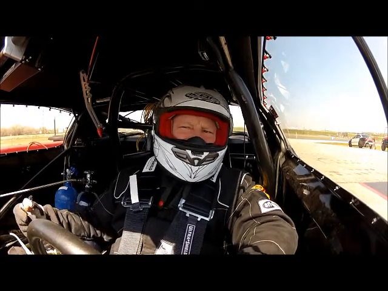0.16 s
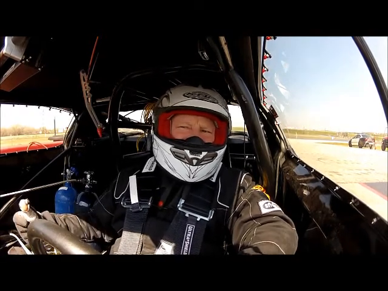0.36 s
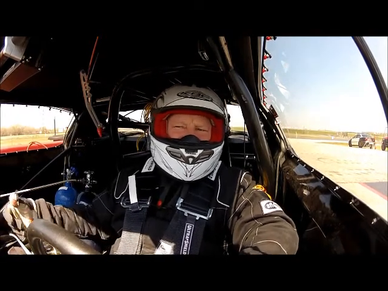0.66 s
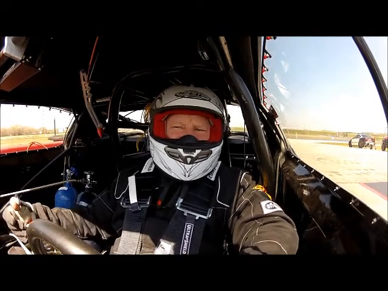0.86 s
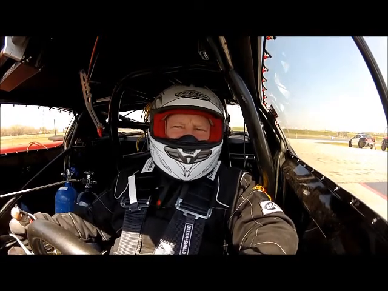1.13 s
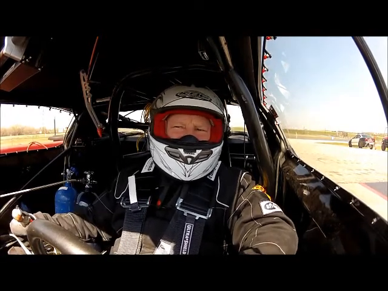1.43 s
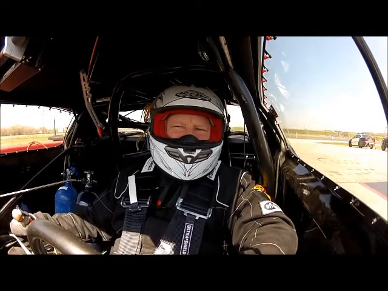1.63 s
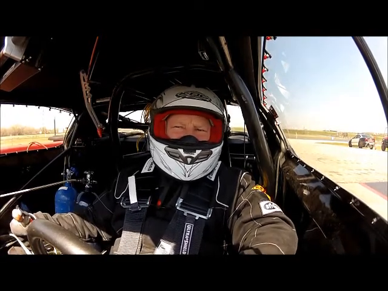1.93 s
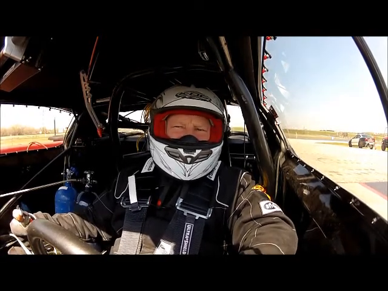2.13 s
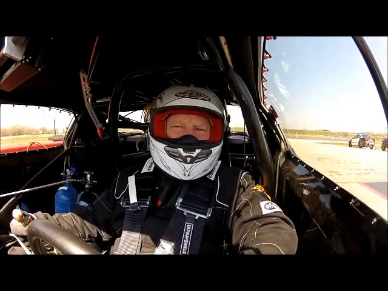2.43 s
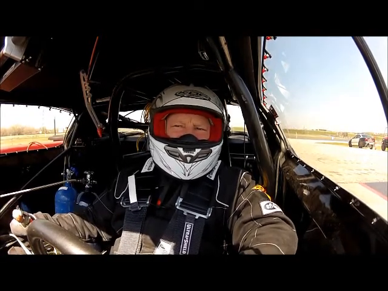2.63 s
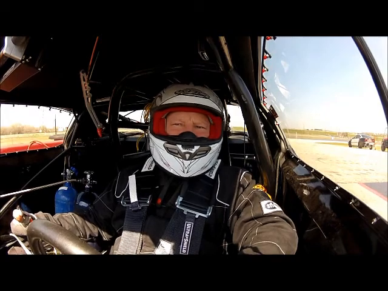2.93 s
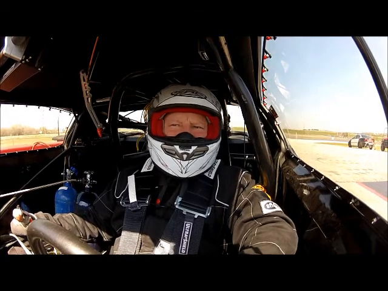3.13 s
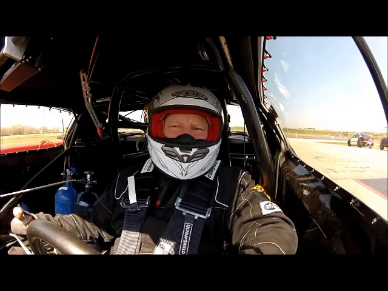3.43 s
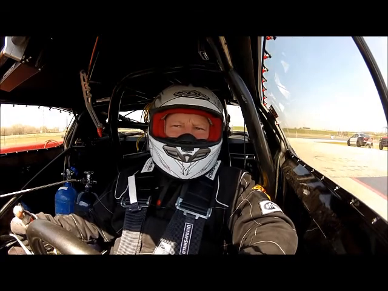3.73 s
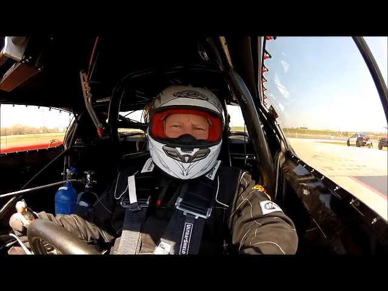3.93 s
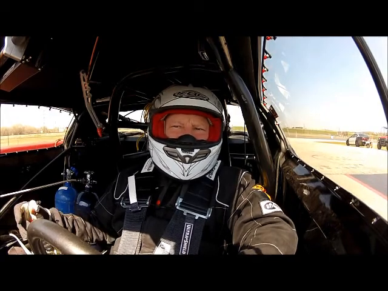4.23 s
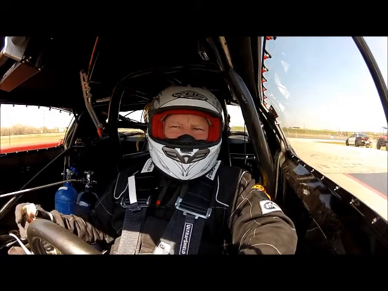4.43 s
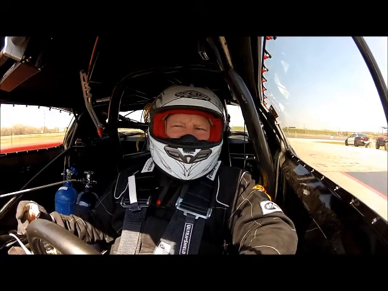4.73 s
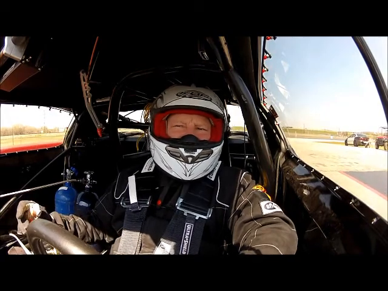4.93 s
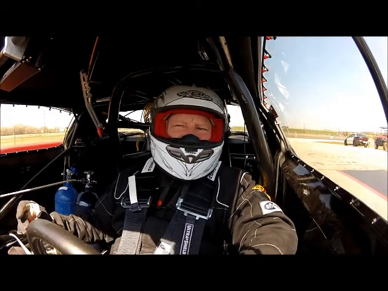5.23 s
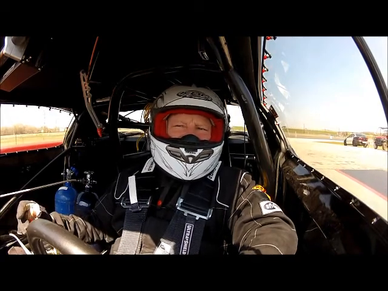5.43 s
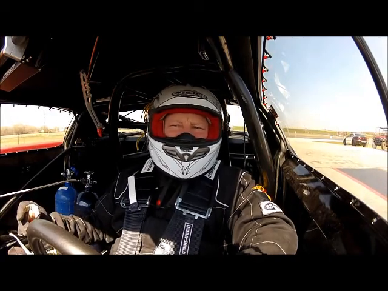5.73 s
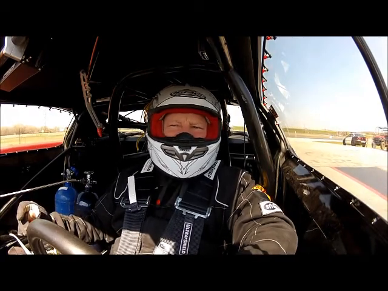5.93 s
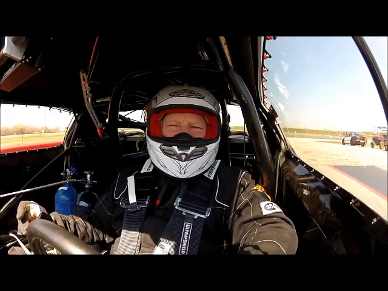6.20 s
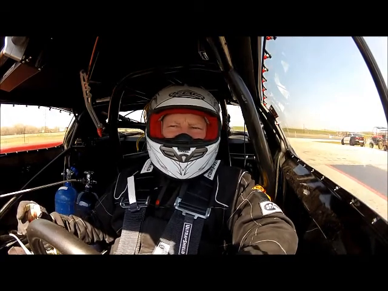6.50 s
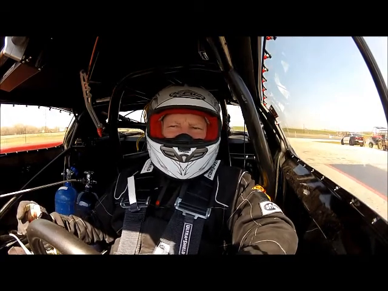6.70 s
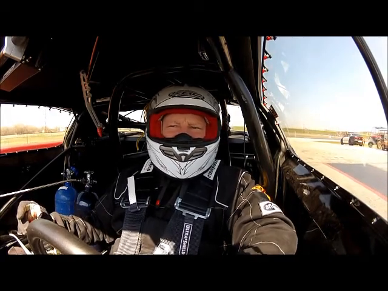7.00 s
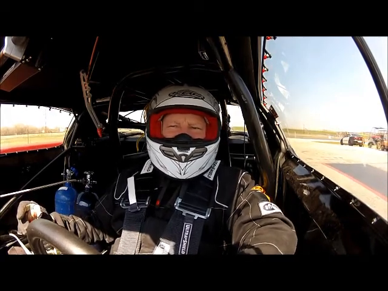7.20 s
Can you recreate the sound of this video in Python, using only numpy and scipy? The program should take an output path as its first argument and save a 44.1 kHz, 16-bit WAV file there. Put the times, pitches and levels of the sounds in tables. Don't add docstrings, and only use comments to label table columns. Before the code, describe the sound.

Inside a stripped race car, deep uneven idle rumble and hard metallic clatter pulse steadily, rev sharply midway, waver, then settle back to idle.

```python
import sys
import numpy as np
from scipy import signal
from scipy.io import wavfile
from scipy.ndimage import uniform_filter1d

SR = 44100
rng = np.random.default_rng(int(sys.argv[2]) if len(sys.argv) > 2 else 0)


def wav_record(signal):
    frames = np.transpose(np.atleast_2d(signal))
    bounded = np.clip(frames, -1, 1)
    quanta = np.round(bounded * 32767).astype(np.int16)
    wavfile.write(sys.argv[1], SR, quanta)


def gain_from_decibels(decibels):
    exponent = np.asarray(decibels, float) / 20
    return 10 ** exponent


N = 324576
TIME = np.arange(N) / SR

# time_s, firings_per_s
ENGINE_SPEED = [(2.7, 67.6), (2.81, 88), (2.95, 112), (3.09, 108), (3.22, 87), (3.4, 77), (3.6, 70),
                (3.81, 93), (4.0, 96), (4.2, 86), (5.14, 79), (5.5, 77), (6.11, 87), (6.3, 72), (6.45, 55),
                (6.74, 55), (6.9, 68), (7.36, 67.8)]
# start_s, peak_db, low_panels_db, gain_drop_db
HARD_CLACKS = [(0.167, -7.5, -12, 9), (0.402, -9.5, -21, 3.5), (0.528, -3.5, -14, 4), (0.762, -8.5, -13, 9),
               (0.997, -9.5, -1, 5), (1.12, -11, -6, 4), (1.354, -9, -9, 7.5), (1.594, -9, -6, 3),
               (1.712, -6, -3, 9.5), (2.068, -7.5, 0, 7.5), (2.304, -8.5, -1, 6.5), (2.423, -10, 12, 7.5),
               (2.779, -7, 4.5, 8.5), (3.076, -22, -2, 5.5), (3.552, -10.5, -11, -1), (3.655, -7.5, -10, 4),
               (3.835, -14.5, 5, 5), (3.997, -9.5, 0, 5), (4.356, -9, -14, 7.5), (4.736, -7, -11, 3),
               (5.141, -8, 6.5, 9.5), (5.341, -11, 16.5, 9.5), (5.544, -8.5, 7, 5.5), (5.737, -11, 9, 6.5),
               (5.926, -7, 6, 5.5), (6.456, -4, -2, 15), (6.605, -8, -15, 6.5), (6.751, -6.5, -9, 7),
               (7.0, -7.5, -13, 10), (7.236, -7, -10, 5.5)]
# pitch_hz, width_hz, level_db
LOW_SHEETS = [(1049, 107, -13.5), (1204, 40.7, -5.5), (1302, 53, -10), (1464, 36.6, -4), (1488, 56, -6),
              (1548.6, 42.5, -3), (1721, 13, -13.5), (1784, 47, -12.5)]
MID_SHEETS = [(1993, 76, -11), (2135, 53, -2), (2248, 66, -10), (2340.4, 39, -2)]
HIGH_SHEETS = [(2590, 48, -16.5), (2840, 138, -19), (3230, 90, -18.5), (3520, 105, -21), (3857, 86, -16.5),
               (4265, 162, -24.5), (4734, 150, -31.5), (5520, 210, -30)]

IDLE_PER_S = 67.6
USUAL_DB, USUAL_LOW_DB, USUAL_DROP_DB = -15, -24, 3
CREST_S = 0.003


def boom(count):
    # time_s, level_db
    drive = [(0, -8.5), (0.38, -4.5), (0.52, -8), (0.7, -3), (1.4, -6.5), (1.54, -8), (1.68, -5.5),
             (2.66, -4.5), (2.74, -14), (3.2, -21), (3.62, -6.5), (3.72, -16.5), (4.92, -12), (6.15, -15),
             (6.35, -9), (6.8, -15.5), (6.95, -3.5), (7.3, -6)]
    cabin_hz, cabin_width_hz = 70.2, 4.8
    clicks = firings(count, spread_db=3.0, pattern=0.6, jitter_s=0.0002)
    lead = SR // 4
    led_in = np.concatenate([clicks[lead * 2:lead * 3], clicks])
    rung = resonate(resonate(led_in, cabin_hz, cabin_width_hz), cabin_hz, 35)
    main_mode = evened(cut(rung, 156, "low", order=4)[lead:], 0.18)
    second_mode = evened(resonate(resonate(clicks, 113.8, 3.8), 118.0, 21), 0.32)
    return gain_from_decibels(curve(drive, TIME)) * main_mode + gain_from_decibels(-34.5) * second_mode


def exhaust(count):
    # pitch_hz, width_hz, level_db
    pipe_modes = [(130, 42.4, -3), (160, 43, -1), (209.6, 26.8, 2), (237.7, 37, 1.5), (303.5, 49.4, 0),
                  (349.7, 50.6, -4), (551.6, 41.5, -4.5), (625, 40, -5.5)]
    level_db = -24 - 0.0258 * above_idle(TIME)
    pulses = firings(count, spread_db=2.2, pattern=1.1, jitter_s=0.0004)
    turbulence = rng.standard_normal(N) * (0.34 + puff(pulses, 0.0024))
    gas = rms_one(pulses) * 0.75 + rms_one(turbulence)
    return gain_from_decibels(level_db) * evened(cut(body(gas, pipe_modes), 574, "low", order=4), 0.076)


def rattle(count):
    chug_floor, chug_s, chug_db = 0.75, 0.014, 5.5
    swell_db, swell_lead_firings = 1.5, 1.2
    s, peak_db, _, _ = all_clacks(count)
    blows = spikes(s, gain_from_decibels(peak_db + chug_db))
    rock = puff(np.roll(blows, -150), chug_s)
    knocks = firings(count, spread_db=2.6, pattern=1.2, jitter_s=0.0008)
    out = 0
    for modes, lag_s, share in ((LOW_SHEETS, 0.006, 1.1), (MID_SHEETS, 0.003, 0.8), (HIGH_SHEETS, 0.002, 0.7)):
        late = np.roll(knocks, int(lag_s * SR))
        shake = 0.22 + rise_fall(late, 0.0005, 0.0035)
        tick_heights = gain_from_decibels(3.1 * np.minimum(rng.exponential(1, N), 4))
        ticks = (rng.random(N) < 900 / SR) * tick_heights * rng.choice([-1, 1], N)
        buzz = rng.standard_normal(N) + 0.5 * rms_one(ticks)
        out = out + body(buzz * shake * (chug_floor + share * rock), modes)
    level_db = -16 + 0.0532 * above_idle(TIME)
    swell = swell_db * np.cos(np.pi / 4 * (count + swell_lead_firings))
    return gain_from_decibels(level_db + swell) * evened(out, 0.14)


def clacks(count):
    s, peak_db, low_db, _ = all_clacks(count)
    high_db = 2 - 0.0057 * above_idle(s)
    chatter = rng.choice([-1, 1], N)
    groups = ((LOW_SHEETS[3:6], low_db + 26.5), (MID_SHEETS, 29), (HIGH_SHEETS, high_db + 23.5))
    out = 0
    for modes, share_db in groups:
        blows = spikes(s - 0.003, gain_from_decibels(peak_db + share_db))
        scrape = chatter * rise_fall(blows, 0.0002, 0.0022)
        out = out + body(scrape + 1.2 * np.roll(blows, 20), modes)
    return out


def throttle_blip():
    start_s, end_s, attack_s, release_s = 2.85, 3.15, 0.079, 0.025
    opened = np.clip(np.minimum((TIME - start_s) / attack_s, (end_s - TIME) / release_s), 0, 1)
    pipes = [(159, 43, -4), (238, 22, 6.5), (311, 37, -1.5), (578.8, 41.8, -6.5)]   # pitch_hz, width_hz, level_db
    roar = evened(body(rng.standard_normal(N), pipes), 0.081)
    sing = evened(resonate(rng.standard_normal(N), 1566, 28), 0.014)
    hiss = rms_one(body(rng.standard_normal(N), HIGH_SHEETS[3:]))
    return opened * (gain_from_decibels(-17) * roar + gain_from_decibels(-17) * sing + gain_from_decibels(-27.5) * hiss)


def fuel_pump():
    # pitch_hz, level_db (rms)
    tones = [(373.5, -31.5), (441, -49.5)]
    waver = 0.56 * rms_one(cut(rng.standard_normal(N), 15.0, "low", order=1))
    out = 0
    for hz, db in tones:
        tone = np.sqrt(2) * np.sin(2 * np.pi * np.cumsum(hz + waver) / SR)
        out = out + gain_from_decibels(db + 2.4 * waver) * tone
    return out


def rumble():
    return gain_from_decibels(-36.5) * rms_one(cut(rng.standard_normal(N), [25, 900], "band", order=1))


def crank():
    count = np.cumsum(curve(ENGINE_SPEED, TIME)) / SR
    clack_s = np.array(HARD_CLACKS)[:, 0] - CREST_S
    slip = np.interp(TIME, clack_s, np.unwrap(np.interp(clack_s, TIME, count) % 8, period=8))
    return count - uniform_filter1d(slip, size=SR // 8) + 16


def above_idle(s):
    return curve(ENGINE_SPEED, s) - IDLE_PER_S


def firings(count, spread_db, pattern, jitter_s):
    cylinder_db = [-11.5, -3.5, -14.5, -7, -10.5, -8, -8.5, -13]
    number = np.arange(int(count[0]) + 1, int(count[-1]))
    chance = rng.standard_normal((900, 2))[number]
    at = np.interp(number, count, TIME) + jitter_s * chance[:, 0]
    uneven_db = spread_db * (1 + np.abs(above_idle(at)) / 22)
    return spikes(at, gain_from_decibels(pattern * np.array(cylinder_db)[number % 8] + uneven_db * chance[:, 1]))


def known_cycles():
    # start_s, peak_db
    firm = [(0.647, -15), (0.876, -10.5), (1.23, -11), (1.834, -12), (1.936, -7), (2.553, -12),
            (2.643, -13), (2.873, -7), (3.44, -12), (3.745, -11), (3.919, -14), (4.092, -9), (4.167, -12.5),
            (4.456, -10), (4.557, -14), (4.846, -12), (4.936, -10), (5.038, -13), (5.238, -11),
            (5.451, -14), (5.644, -9.5), (5.832, -12), (6.02, -5.5), (6.114, -9), (6.212, -18), (6.32, -12),
            (6.869, -11.5)]
    return sorted(HARD_CLACKS + [(s, db, USUAL_LOW_DB, USUAL_DROP_DB) for s, db in firm])


def all_clacks(count):
    # start_s, peak_db
    strays = [(0.36, -9), (0.439, -6), (0.515, -5), (0.634, -8), (1.552, -10), (2.246, -5), (3.509, -7),
              (4.631, -6), (6.822, -10), (7.177, -2)]
    early_firings, early_db = 2.8, -7.5
    ends = np.arange(np.ceil(count[0] / 8), count[-1] // 8 + 1) * 8
    known = known_cycles()
    known_s = np.array(known)[:, 0]
    usual = [(s, USUAL_DB, USUAL_LOW_DB, USUAL_DROP_DB)
             for s in np.interp(ends, count, TIME) + CREST_S if np.abs(known_s - s).min() > 0.03]
    early = [(s, USUAL_DB + early_db, USUAL_LOW_DB, 0)
             for s in np.interp(ends - early_firings, count, TIME)]
    loose = [(s, db, USUAL_LOW_DB, USUAL_DROP_DB) for s, db in strays]
    return np.transpose(known + usual + early + loose)


def curve(table, s):
    return np.interp(s, *np.transpose(table))


def spikes(s, heights):
    out = np.zeros(N)
    out[np.clip(s * SR, 0, N - 1).astype(int)] = heights
    return out


def puff(x, decay_s):
    return signal.lfilter([1], [1, -np.exp(-1 / (decay_s * SR))], x + 1e-18)


def rise_fall(x, rise_s, fall_s):
    return puff(puff(x, rise_s), fall_s) / (rise_s * SR)


def resonate(x, hz, width_hz):
    r = np.exp(-np.pi * width_hz / SR)
    zeros = np.array([1, 0, -1]) * (1 - r * r) / 2
    return signal.lfilter(zeros, [1, -2 * r * np.cos(2 * np.pi * hz / SR), r * r], x)


def body(x, modes):
    return sum((-1) ** k * gain_from_decibels(db) * resonate(x, hz, width) for k, (hz, width, db) in enumerate(modes))


def cut(x, hz, kind, order):
    return signal.sosfilt(signal.butter(order, hz, kind, fs=SR, output="sos"), x)


def rms_one(x):
    return x / np.sqrt(np.mean(x ** 2) + 1e-20)


def evened(x, span_s):
    size = int(span_s * SR)
    power = uniform_filter1d(uniform_filter1d(x ** 2, size=size), size=size)
    return x / np.sqrt(power + 1e-12)


def scene():
    count = crank()
    metal = cut(rattle(count) + clacks(count), 960, "high", order=4)
    mix = boom(count) + exhaust(count) + metal + throttle_blip() + fuel_pump() + rumble()
    return mix[None]


def top_cut(x):
    return signal.sosfilt(signal.butter(12, 15680, fs=SR, output="sos"), x)


def record(dry):
    attack_s, release_s = 0.012, 0.079
    s, _, _, drop_db = all_clacks(crank())
    sudden_db = puff(spikes(s + 0.0025 + attack_s / 2, np.maximum(drop_db, 0)), release_s)
    gain_db = -uniform_filter1d(sudden_db, size=int(attack_s * SR))
    ducked = cut(dry[0] * gain_from_decibels(gain_db), 5600, "low", order=10)
    coarse = signal.resample_poly(ducked, 40, 147)
    held = np.repeat(np.clip(coarse, -0.99, 0.99), 4)
    out = signal.resample_poly(held, 147, 160)[:N]
    out = signal.sosfilt(signal.ellip(9, 0.1, 32, 15230, fs=SR, output="sos"), out)
    return top_cut(np.clip(out, -1, 1)[None])


dry = scene()
out = record(dry)
wav_record(out)
```